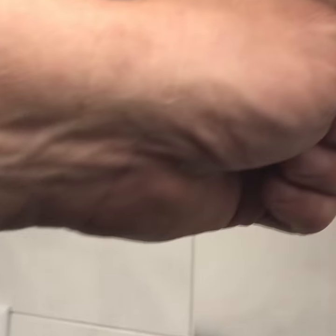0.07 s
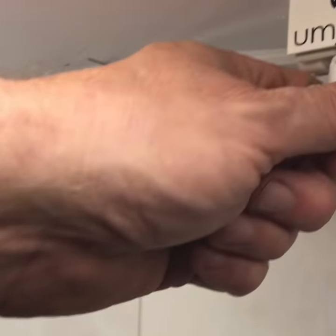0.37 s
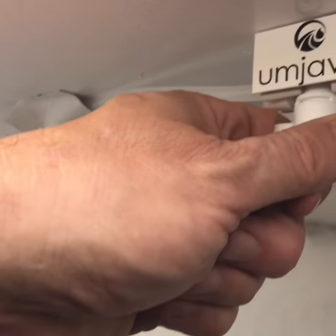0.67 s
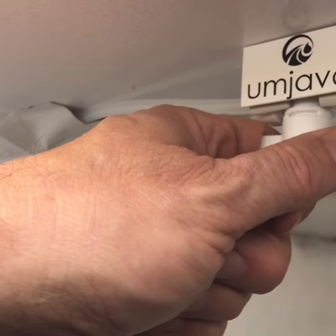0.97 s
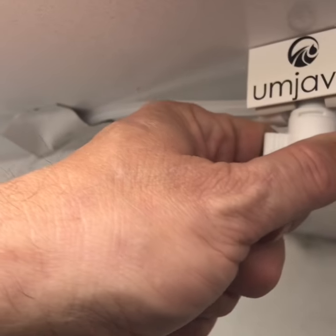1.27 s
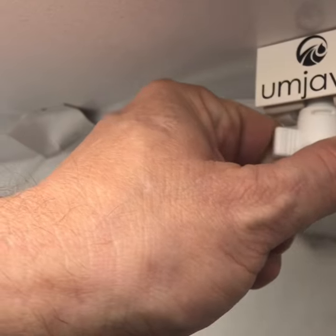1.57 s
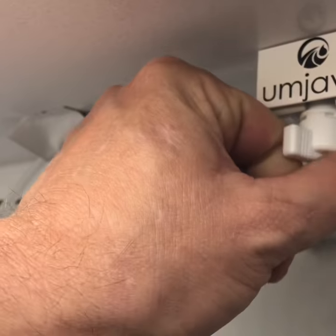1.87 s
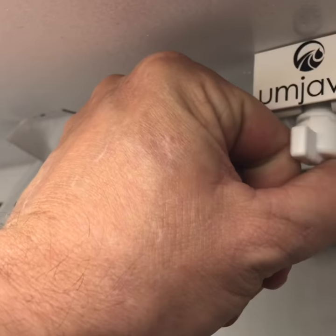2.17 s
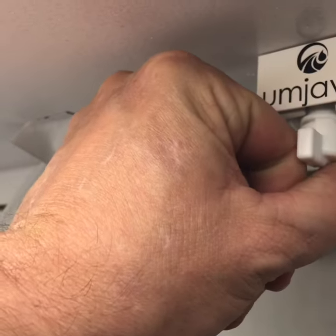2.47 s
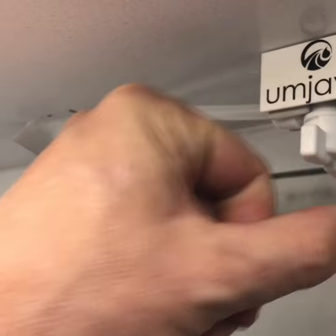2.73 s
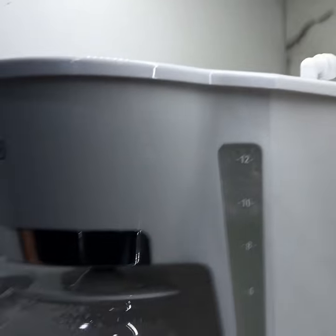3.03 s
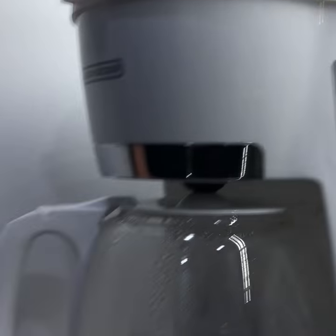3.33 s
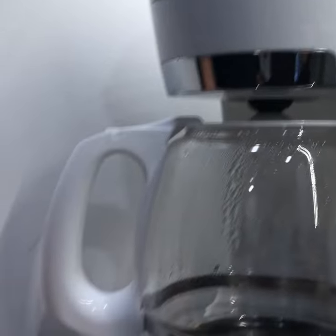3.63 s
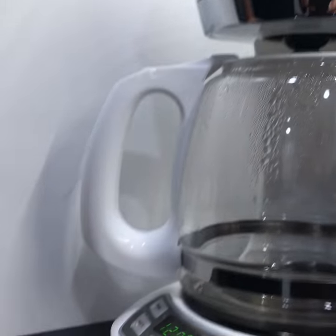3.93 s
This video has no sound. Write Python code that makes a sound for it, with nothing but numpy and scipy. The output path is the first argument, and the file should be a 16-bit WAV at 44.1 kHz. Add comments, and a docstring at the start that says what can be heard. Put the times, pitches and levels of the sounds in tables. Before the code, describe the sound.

Water rushes through a small valve, hisses as it shuts, then plastic clicks and clacks.

```python
"""First you hear water rushing and gurgling through a small plastic valve in a kitchen, with bubbles
popping in it. A hand turns the valve shut: the narrowing gap thins the rush to a hiss, which stops, and
the last water spits out. The handle knocks, scrapes and squeaks. Then hard plastic parts click and
clack, making their housing ring. A low mains hum and faint room noise lie underneath."""
import sys
import numpy as np
from scipy import signal
from scipy.io import wavfile
from scipy.ndimage import uniform_filter1d

SR = 44100
rng = np.random.default_rng(int(sys.argv[2]) if len(sys.argv) > 2 else 0)


def transcribe(signal):
    """Save signal, clipped to [-1, 1], as a 16-bit WAV file at the path in sys.argv[1]."""
    frames = np.atleast_2d(signal).T
    limited = np.clip(frames, -1, 1)
    pcm = np.round(limited * 32767).astype(np.int16)
    wavfile.write(sys.argv[1], SR, pcm)


N = 176400
T = np.arange(N) / SR

# Pitches at which the tube and valve ring: (pitch [Hz], width [Hz], boost [dB])
TUBE_RESONANCES = [(202.6, 22.3, 14.5), (317.3, 20, 11.5), (441, 16, 8.5), (712, 72, 7),
                   (816.4, 18.6, 11.5), (1090, 26, 10), (2570, 39, 2), (3030, 41, 8.5), (3525, 44, 8.5),
                   (4493, 37, 12.5), (5230, 32, 10.5), (6090, 140, 6.5), (6720, 130, 8), (7320, 110, 7),
                   (12370, 940, 6.5)]


def from_db(db):
    """Turn decibels into a number to multiply by."""
    return 10 ** (np.asarray(db) / 20)


def rms_one(x):
    """Scale a sound so that its average strength (rms) is 1."""
    return x / np.sqrt(np.mean(x ** 2) + 1e-20)


def in_time(rows):
    """Join rows of (time, values...) with straight lines, giving one curve per value column."""
    times, *columns = np.transpose(rows)
    return [np.interp(T, times, column) for column in columns]


def drift(rate_hz):
    """A smooth random wander of about 1 either way; a higher rate wanders faster."""
    step, warm_up = 40, 2000
    r = np.exp(-2 * np.pi * rate_hz * step / SR)
    noise = rng.standard_normal(N // step + warm_up + 2)
    slow = signal.lfilter([1], [1, -2 * r, r * r], noise)[warm_up:]
    return np.interp(np.arange(N) / step, np.arange(len(slow)), rms_one(slow))


def band(x, low, high):
    """Keep the part of a sound between two frequencies in Hz."""
    return signal.sosfilt(signal.butter(2, [low, min(high, .45 * SR)], "band", fs=SR, output="sos"), x)


def resonate(x, hz, width):
    """Let a sound ring at one pitch; a smaller width rings longer."""
    r = np.exp(-np.pi * width / SR)
    feedback = [1, -2 * r * np.cos(2 * np.pi * hz / SR), r * r]
    return signal.lfilter(np.array([1, 0, -1]) * (1 - r * r) / 2, feedback, x + 1e-18)


def body(x, resonances):
    """Boost a sound at the ringing pitches of the object it passes through."""
    return x + sum((from_db(db) - 1) * resonate(x, hz, width) for hz, width, db in resonances)


def banded_noise(spectrum, patchy_db, flicker_hz, surge_db):
    """Noise in half-octave bands that flicker separately (patchy_db) and swell together (surge_db)."""
    edges = 25 * 2 ** np.arange(0, 9.6, .5)
    hz, db = np.transpose(spectrum)
    out, together, white = 0, drift(flicker_hz), rng.standard_normal((2, N))
    for k, (low, high) in enumerate(zip(edges, edges[1:])):
        if high > hz[0] / 2 and low < hz[-1] * 2:
            level = np.interp(np.log(low * high) / 2, np.log(hz), db)
            gain = from_db(level + patchy_db * drift(flicker_hz) + surge_db * together)
            out = out + gain * band(white[k % 2], low, high)
    return rms_one(out)


def bursts(rows, t60, attack_s):
    """Loudness curve for events (time [s], level [dB]) that rise fast and fade 60 dB in t60 seconds."""
    out = np.zeros(N)
    for s, db in rows:
        start = int(s * SR)
        age = T[:min(N - start, SR // 2)]
        out[start:start + len(age)] += from_db(db - 60 * age / t60) * (1 - np.exp(-age / attack_s))
    return out


def noise_at(hz, width):
    """Noise gathered around one pitch."""
    return rms_one(resonate(resonate(rng.standard_normal(N), hz, width), hz, width))


def water():
    """Flowing water gurgles and rushes in the tube, then hisses as a thin jet in the closing gap."""
    # Flow through the valve: (time [s], gurgle level [dB], rush level [dB])
    flow = [(0, -30.5, -35), (.7, -29.5, -34), (1.22, -32, -34.5), (1.34, -32, -33), (1.52, -29, -31.5),
            (1.63, -34.5, -36.5), (1.73, -53.5, -50), (1.89, -46, -44)]
    # Strength of the jet: (time [s], level [dB])
    jet = [(0, -39.5), (1.3, -40.5), (1.42, -40.5), (1.48, -28), (1.59, -24.5), (1.635, -22.5),
           (1.665, -27), (1.69, -43.5), (1.73, -54), (1.86, -53), (1.935, -45), (1.957, -24), (1.972, -45),
           (2.01, -79)]
    # Tone of the low gurgle, bright rush and high hiss: (frequency [Hz], relative level [dB])
    gurgle_tone = [(30, -62), (60, 0.5), (110, -1.5), (145, -5.5), (190, -4.5), (330, -3), (520, -6.5),
                   (850, -14.5), (1400, -14.5), (2500, -18)]
    rush_tone = [(500, -14.5), (1000, 5.5), (1500, -4), (2300, 2.5), (3500, -3.5), (7500, -5), (10000, -5),
                 (12500, -16), (16000, -44)]
    hiss_tone = [(2000, -22), (4500, -19), (6800, -16.5), (8500, 2), (10500, -18.5), (12400, 2),
                 (14000, -1), (16000, -12.5)]
    shut_s, drain_db_per_s = 1.93, 83
    gurgle_db, rush_db = np.array(in_time(flow)) - drain_db_per_s * np.maximum(T - shut_s, 0)
    jet_db = in_time(jet)[0] - drain_db_per_s * np.maximum(T - jet[-1][0], 0)
    gurgle = banded_noise(gurgle_tone, patchy_db=2.5, flicker_hz=35, surge_db=2)
    rush = banded_noise(rush_tone, patchy_db=2.5, flicker_hz=55.6, surge_db=3.66)
    hiss = banded_noise(hiss_tone, patchy_db=-.5, flicker_hz=41.8, surge_db=3)
    layers = [(gurgle, gurgle_db - 2), (rush, rush_db - 1.5),
              (small_bubbles(), rush_db - 4.5), (hiss, jet_db - .5)]
    low, *bright = [from_db(db) * rms_one(body(x, TUBE_RESONANCES)) for x, db in layers]
    return low + tube_echo(sum(bright) + half_shut_hiss())


def small_bubbles(per_second=330, spread_db=3):
    """A crowd of small bubbles, each ringing briefly at a random pitch."""
    sizes = from_db(spread_db * np.minimum(rng.exponential(1, N), 4)) * rng.choice([-1, 1], N)
    kicks = sizes * (rng.random(N) < per_second / SR)
    pitches = np.geomspace(1800, 9000, 24)
    chosen = rng.integers(0, len(pitches), N)
    rings = (resonate(kicks * (chosen == k), hz, hz / 61.5) / hz ** .57 for k, hz in enumerate(pitches))
    return rms_one(sum(rings))


def tube_echo(x):
    """Sound bounces back from the end of the tube with its wave turned upside down."""
    # The bounce: (delay [s], gain [ratio])
    echoes = [(.00272, -.28)]
    return x + sum(gain * np.interp(T - delay, T, x, left=0) for delay, gain in echoes)


def background():
    """A wavering mains hum and faint room noise; both dip briefly near three seconds."""
    # Tones of the hum: (pitch [Hz], level [dB])
    hum_tones = [(62, -59), (119, -53.5)]
    # Tone of the room noise: (frequency [Hz], relative level [dB])
    room_tone = [(25, -39), (45, -11), (65, -6), (120, -3), (190, -14), (350, -16), (800, -20.5),
                 (1600, -24), (4000, -29.5), (10000, -33), (16000, -30.5)]
    # The dip: (time [s], level change [dB])
    dip = [(2.926, -20.5), (2.955, -6), (2.984, -23.5)]
    hum = 0
    for hz, db in hum_tones:
        strength = np.sqrt(2) * from_db(db + 1.5 * drift(6))
        hum = hum + strength * np.sin(2 * np.pi * hz * T + .6 * drift(4))
    air = from_db(-52.5) * banded_noise(room_tone, patchy_db=-1, flicker_hz=24, surge_db=-.35)
    dip_db, = in_time([(2.91, 0), *dip, (3.005, 0)])
    return (hum + air) * from_db(dip_db)


def bubble(s, hz, db, wobble, t60=.054, rise_per_s=1.36):
    """One bubble rings at time s, wobbling and rising in pitch as it fades."""
    age = T[:SR // 10]
    flutter = rms_one(uniform_filter1d(rng.standard_normal(len(age)), size=40))
    pitch = hz * (1 + rise_per_s * age + wobble * flutter)
    loudness = from_db(db - 60 * age / t60) * (1 - np.exp(-age / .001))
    ring = np.sqrt(2) * loudness * np.sin(2 * np.pi * np.cumsum(pitch) / SR)
    return np.pad(ring, (int(s * SR), N))[:N]


def spray(count=120, end_s=1.3, low_hz=4650, high_hz=10210, fade_db_per_s=10.5):
    """Tiny bubbles chirp at random while the valve is open, and bursts of air splutter."""
    # Bright splutters: (time [s], level [dB])
    splutters = [(.07, -27), (.15, -23), (.375, -27), (.477, -27), (.767, -24), (.995, -24.5)]
    # Each chirp gets a random (time [s], pitch [Hz], level before the fade [dB]).
    chirps = rng.uniform([0, low_hz, -43.5], [end_s, high_hz, -33.5], (count, 3))
    fizz = sum(bubble(s, hz, db - fade_db_per_s * s, wobble=.05) for s, hz, db in chirps)
    air = rms_one(band(rng.standard_normal(N), low_hz, high_hz))
    return body(fizz, TUBE_RESONANCES) + bursts(splutters, t60=.054, attack_s=.00073) * air


def air_pockets():
    """Trapped air pops through the gap and glugs in the tube; the last water spits from the shut valve."""
    # Air popping through: (time [s], pitch [Hz], level [dB], wobble [share of the pitch])
    pockets = [(0.027, 5860, -24.5, 0.077), (.108, 7300, -22, 0.19), (.151, 716, -24, 0.31),
               (.284, 3380, -28.5, 0.018), (0.487, 5260, -23.5, 0.036), (0.607, 3580, -26.5, 0.14),
               (0.7, 4440, -29.5, 0.044), (0.764, 3115, -21, 0.095), (.911, 2204, -22, 0.26),
               (.993, 4560, -24.5, 0.043), (1.1, 1283, -26.5, 0.11), (1.139, 4190, -23, 0.157),
               (1.268, 855, -17.5, 0.13), (1.278, 4500, -19.5, 0.036), (1.306, 5230, -24.5, 0.025),
               (1.520, 5230, -17, .025)]
    # Last spits of water: (time [s], level [dB], pitch [Hz])
    last_spits = [(2.192, -46, 4080), (2.31, -48.5, 4080), (2.364, -39.5, 9500), (2.455, -54, 7350)]
    # Low glugs: (time [s], level [dB])
    glugs = [(.15, -14), (.408, -12), (.428, -17), (.998, -15), (1.11, -14.5), (1.27, -14.5)]
    pops = sum(bubble(*row) for row in pockets)
    spits = sum(bubble(s, hz, db, wobble=.097) for s, db, hz in last_spits)
    return pops + spits + bursts(glugs, t60=.061, attack_s=.012) * noise_at(hz=240, width=350)


def half_shut_hiss(peak_s=1.372, width_s=.17):
    """A dense, even hiss swells in the tube while the valve is half shut."""
    swell = from_db(-32) * np.exp(-((T - peak_s) / width_s) ** 2)
    hiss = band(rng.standard_normal(N), 1900, 4550)
    return swell * rms_one(body(hiss, TUBE_RESONANCES))


def handle_knocks():
    """Short knocks make the valve's handle ring, and the kitchen echoes them."""
    # Knocks on the handle: (time [s], relative level [dB])
    strikes = [(1.915, -22), (2.017, -28.5), (2.102, -21.5), (2.24, -15.5), (2.294, -27.5), (2.707, -34.5)]
    # The handle's ringing pitches: (pitch [Hz], width [Hz], relative level [dB])
    modes = [(408, 80, -5.5), (1110, 82, 1.5), (1300, 74, -0.5), (1620, 260, -5.5), (1910, 210, -2),
             (2056, 134, -2.5), (2800, 980, -20.5)]
    contact = bursts(strikes, t60=.021, attack_s=.0003) * rng.standard_normal(N)
    ring = sum((-1) ** k * from_db(db) * resonate(contact, hz, width)
               for k, (hz, width, db) in enumerate(modes))
    knocks = from_db(12.5) * band(ring, 220, 5400)
    return knocks + from_db(-16) * kitchen_echo(knocks)


def kitchen_echo(x, t60=.23, cutoff_hz=3000):
    """Many bounces around the kitchen blur into a short, dull tail."""
    age = T[:SR // 2]
    tail = rng.standard_normal(len(age)) * from_db(-60 * age / t60) * (1 - np.exp(-age / .0035))
    tail = signal.sosfilt(signal.butter(1, cutoff_hz, fs=SR, output="sos"), tail)
    return signal.fftconvolve(x, tail / np.sqrt(np.sum(tail ** 2)))[:N]


def handle_scrape():
    """The handle rubs with a gritty sound as it settles into place."""
    # Scrapes: (time [s], level [dB])
    scrapes = [(2.016, -39), (2.09, -63)]
    grit = from_db(3.3 * drift(90)) * rng.standard_normal(N)
    return bursts(scrapes, t60=.23, attack_s=.00085) * rms_one(band(grit, 379, 3870))


def hand_bumps():
    """The hand bumps the hollow housing, which gives soft, low thuds."""
    # Bumps: (time [s], level [dB])
    bumps = [(2.115, -34.5), (3.19, -37), (3.484, -37), (3.52, -36), (3.67, -33)]
    return bursts(bumps, t60=.2, attack_s=.0034) * noise_at(hz=147, width=162)


def handle_squeak(middle_s=2.52, length_s=.24, top_hz=3900, bend_hz=393):
    """The handle gives one faint squeak that rises and falls in pitch and loudness."""
    position = np.clip(2 * (T - middle_s) / length_s, -1, 1)
    pitch = top_hz - bend_hz * position ** 2 + 25 * drift(60)
    return from_db(-66) * (1 - position ** 2) * np.sin(2 * np.pi * np.cumsum(pitch) / SR)


def plastic_clicks():
    """Each click makes the housing ring at many pitches at once; the low ones last longest."""
    # Clicks, with a level for four ranges: (time [s], thud [dB], body [dB], snap [dB], top [dB])
    clicks = [(2.75, -57, -49.5, -46.5, -80), (3.023, -70, -51.5, -54, -53),
              (3.249, -52.5, -47.5, -50, -71), (3.3044, -39.5, -38.5, -35.5, -39),
              (3.341, -51, -39, -49, -69), (3.3856, -73, -42.5, -39.5, -51), (3.4182, -39, -28.5, -16, -31),
              (3.447, -64, -46, -34, -32), (3.4798, -30, -20.5, -23.5, -26.5), (3.506, -44, -30, -54, -45),
              (3.561, -47, -27, -22.5, -32), (3.647, -45, -40.5, -63, -63), (3.67, -44, -36, -65, -67)]
    # Those four ranges: (low edge [Hz], high edge [Hz], gain [dB], time to fade 60 dB [s])
    ranges = [(184, 670, 1.5, 0.084), (830, 2730, 0, 0.039), (2470, 6030, 1.5, 0.033),
              (9500, 15300, 3.5, 0.011)]
    # The plastic housing's ringing pitches: (pitch [Hz], width [Hz], boost [dB])
    housing = [(856, 86, 13), (1250, 250, 7.5), (3840, 330, -0.5), (8740, 960, 10.5)]
    out = 0
    for k, (low, high, gain_db, t60) in enumerate(ranges):
        strikes = [(s, levels[k] + gain_db) for s, *levels in clicks]
        ring = bursts(strikes, t60, attack_s=.0002) * rng.standard_normal(N)
        make_up = np.sqrt(SR / 2 / (high - low))  # restores the strength the filter takes away
        out = out + make_up * band(ring, low, high)
    out = body(out, housing) + latch()
    return out + from_db(-17) * kitchen_echo(out)


def latch():
    """A stiff plastic catch snaps over and rings briefly at a few clear pitches."""
    # Snaps of the catch: (time [s], level [dB], treble tilt [dB per octave])
    snaps = [(3.418, -22, 0.5), (3.561, -25.5, -0.5)]
    # Its ringing pitches: (pitch [Hz], relative level [dB])
    modes = [(1330, -1), (3840, -1), (4350, -5), (4760, -4), (5350, -5), (6850, -6), (8600, 1.5),
             (9650, -3)]
    out = 0
    for hz, mode_db in modes:
        octaves_up = np.log2(hz / modes[0][0])
        strikes = [(s, db + mode_db + tilt * octaves_up) for s, db, tilt in snaps]
        tone = np.sin(2 * np.pi * (hz * T + rng.random()))
        out = out + bursts(strikes, t60=.036, attack_s=.0004) * tone
    return out


def scene():
    """Add all the sounds together in one channel."""
    wet = water() + spray() + air_pockets()
    handle = handle_knocks() + handle_squeak() + handle_scrape()
    return (wet + handle + plastic_clicks() + hand_bumps() + background())[None]


def record(dry, cutoff_hz=16000):
    """Gently round off the loudest peaks and cut the highest treble."""
    rounded = .61 * np.tanh(dry / .6)
    return signal.sosfilt(signal.ellip(10, .2, 80, cutoff_hz, fs=SR, output="sos"), rounded)


dry = scene()
out = record(dry)
transcribe(out)
```